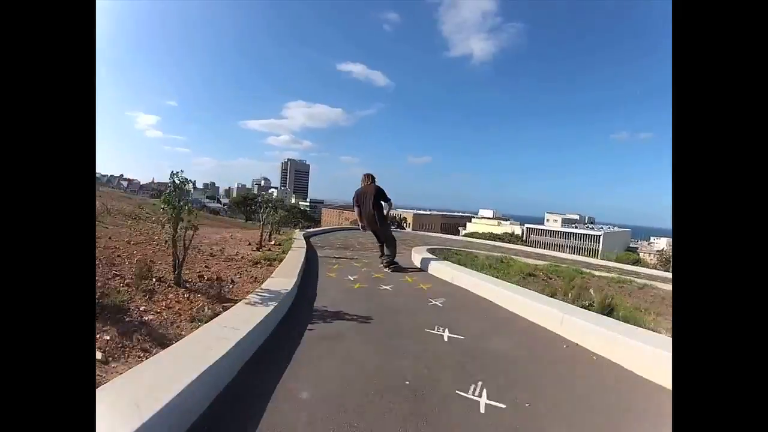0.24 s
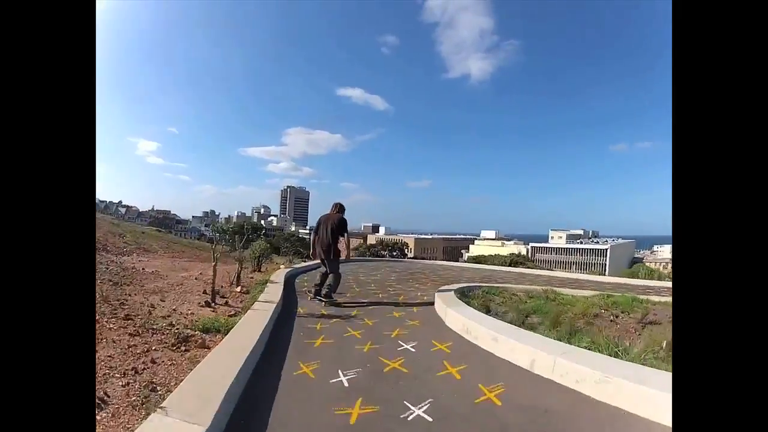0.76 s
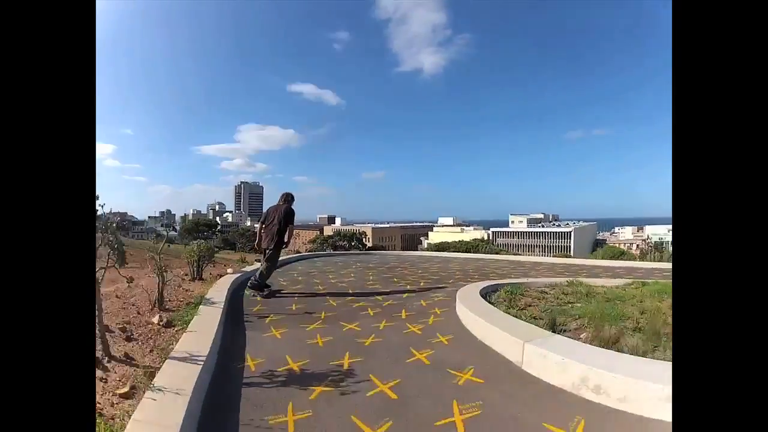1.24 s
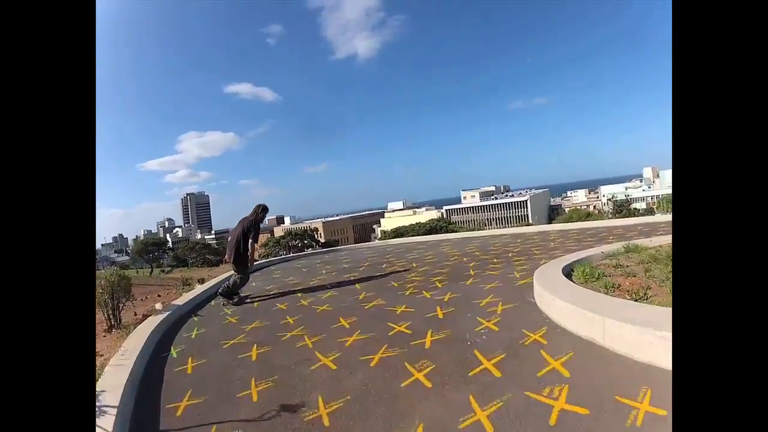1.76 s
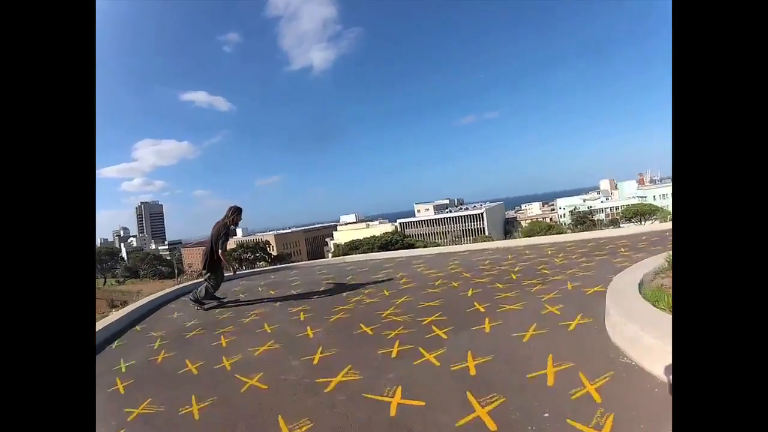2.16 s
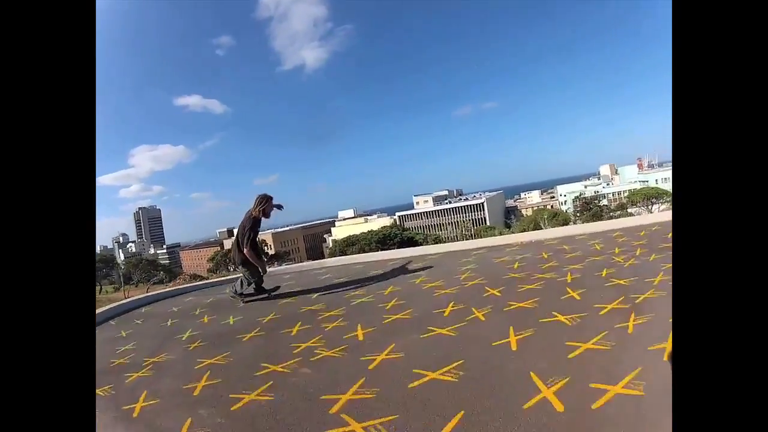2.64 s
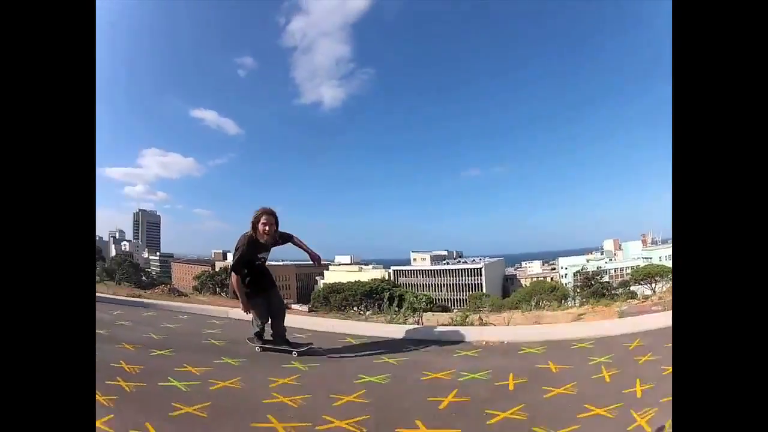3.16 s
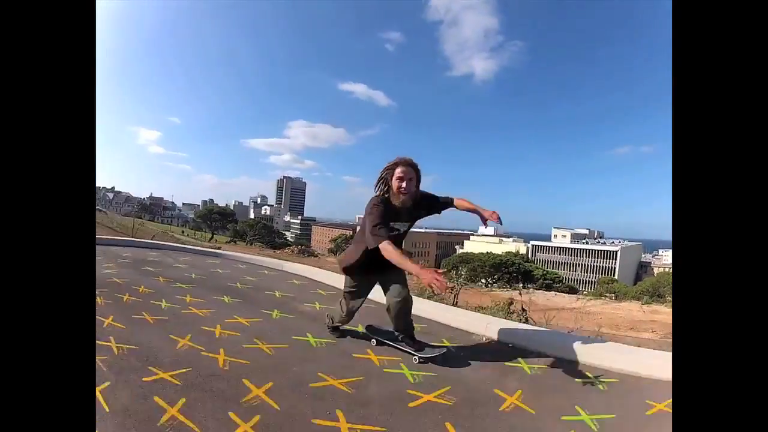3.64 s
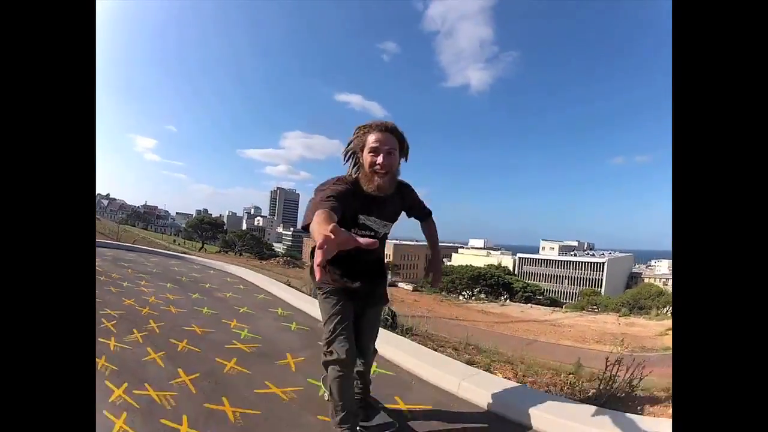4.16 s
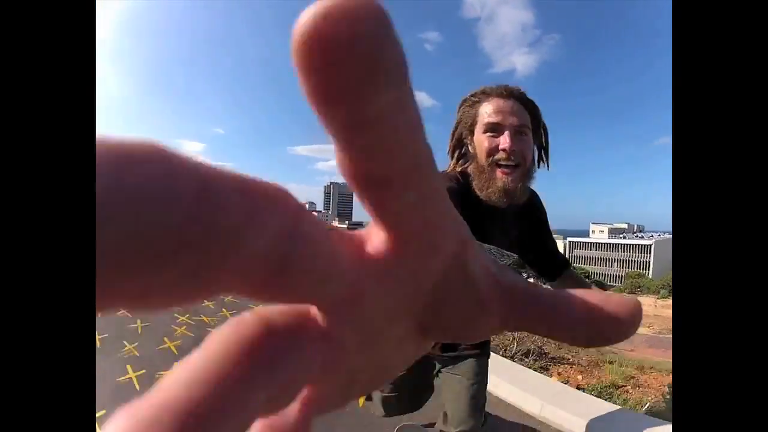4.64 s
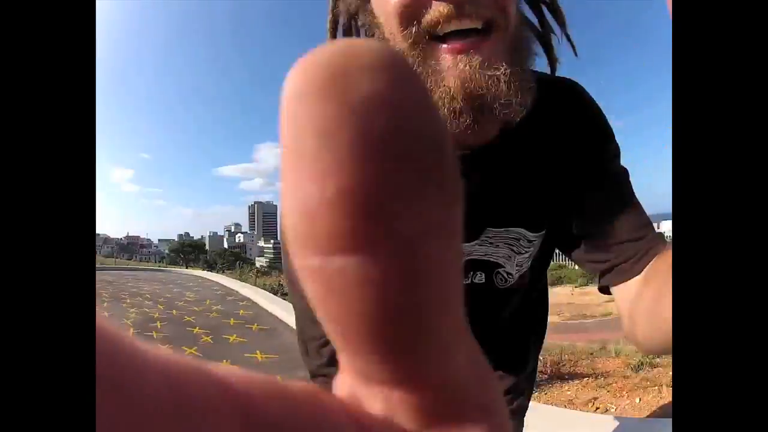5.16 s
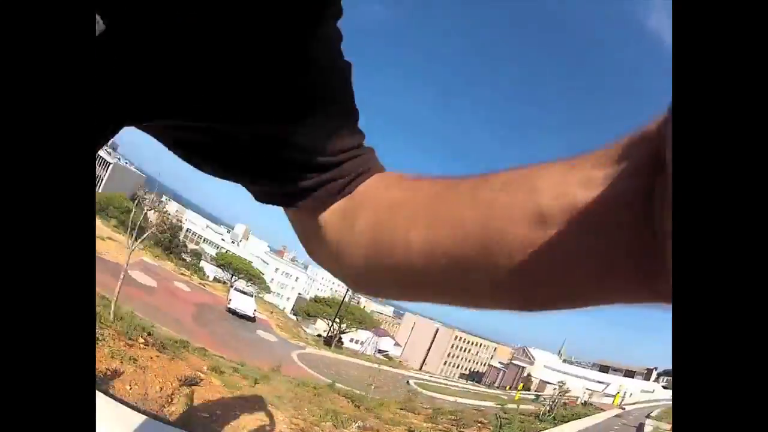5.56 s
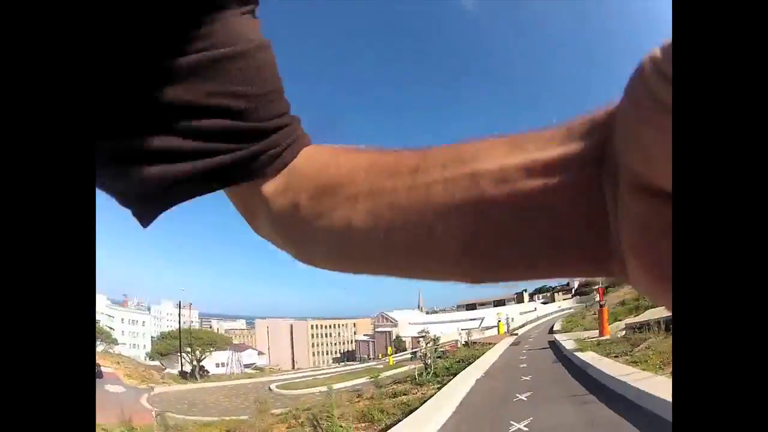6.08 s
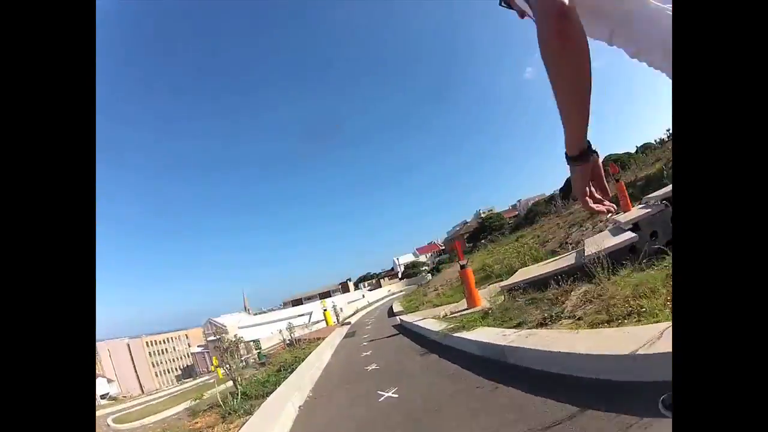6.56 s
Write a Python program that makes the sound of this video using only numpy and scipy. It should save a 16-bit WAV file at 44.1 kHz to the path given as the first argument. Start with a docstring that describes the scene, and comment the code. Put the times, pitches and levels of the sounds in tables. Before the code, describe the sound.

A low, boxy rolling drone of a skateboard outdoors, with dry ticks and deck knocks, then overloaded handling thumps and crackle before rolling on.

```python
"""A skateboard rolls over asphalt: grain under the wheels is random impulses that ring the deck, grit hisses.
Deck knocks and hand bumps are damped swings; ticks, scrapes and crackles are noise bursts in resonances.
Wind and a grabbing hand buffet a closed case as low noise, and the grip on it crackles.
The microphone in the case feeds a recorder that ducks after peaks, clips, and holds each coarse
sample as a stair step."""
import sys
import numpy as np
from scipy import signal
from scipy.fft import rfft, irfft
from scipy.io import wavfile
from scipy.ndimage import uniform_filter1d

SR = 44100
rng = np.random.default_rng(int(sys.argv[2]) if len(sys.argv) > 2 else 0)


def wav_record(signal):
    """Record a signal, one row per channel, as 16-bit PCM in the file named by sys.argv[1]."""
    frames = np.transpose(np.atleast_2d(signal))
    bounded = np.clip(frames, -1, 1)
    # unit amplitude maps onto the largest positive 16-bit level
    quanta = np.round(bounded * 32767).astype(np.int16)
    wavfile.write(sys.argv[1], SR, quanta)


N = 300762


def gain_of(db):
    """Logarithmic level: decibels to amplitude gain."""
    return 10 ** (np.asarray(db) / 20)


def evened(x):
    """Power normalization: scales to rms 1."""
    return x / np.sqrt(np.mean(x ** 2) + 1e-20)


def curves(rows):
    """Piecewise-linear envelopes: table columns joined by straight lines at every sample."""
    s, *columns = np.transpose(rows)
    return [np.interp(np.arange(N) / SR, s, c) for c in columns]


def add(mix, s, sound):
    """Superposition: adds a sound into the mix at s seconds."""
    part = mix[round(s * SR):][:len(sound)]
    part += sound[:len(part)]


def resonate(x, hz, width):
    """Resonance: shifts hz down to zero, smooths by two one-pole passes, shifts back; gain 1 at the centre."""
    turn = np.exp(2j * np.pi * hz * np.arange(len(x)) / SR)
    r = np.exp(-np.pi * width / SR)
    smooth = signal.lfilter([(1 - r) ** 2], [1, -2 * r, r * r], x / turn)
    return 2 * (turn * smooth).real


def read(points, at):
    """Spectral envelope: its level in dB at given frequencies, joined on a log-frequency axis."""
    f, db = np.transpose(points)
    return np.interp(np.log(at + 1), np.log(f + 1), db)


def colour(x, points):
    """Linear filtering: multiplies the spectrum of x by an envelope."""
    hz = np.fft.rfftfreq(len(x), 1 / SR)
    return evened(irfft(rfft(x) * gain_of(read(points, hz)), len(x)))


def patchy(x, gain_db, patchy_db):
    """Time-varying filtering: gain_db(hz, t) per frame, plus random patches over pitch and time."""
    hz, t, z = signal.stft(x, SR, nperseg=1024, noverlap=768)
    spots = rng.standard_normal(z.shape[::-1]).T
    spots = uniform_filter1d(uniform_filter1d(spots, size=6, axis=0), size=14, axis=1)
    gain = gain_of(gain_db(hz[:, None], t) + patchy_db * evened(spots))
    return evened(signal.istft(z * gain, SR, nperseg=1024, noverlap=768)[1][:N])


def flicker(per_s):
    """Low-passed noise: a slow chance curve of rms 1 that changes about per_s times a second."""
    size = max(round(SR / per_s), 1)
    return evened(uniform_filter1d(uniform_filter1d(rng.standard_normal(N), size), size))


def stones(per_s, spread_db):
    """Random impulse process: clicks of random sign at random moments; a few are large."""
    size = gain_of(spread_db * np.minimum(rng.exponential(1, N), 5))
    sign = np.sign(rng.standard_normal(N))
    struck = rng.random(N) < per_s / SR
    return size * sign * struck


# steady wind and handling on the case: start_s [s], level_db [dB]
BUFFET_LEVEL = [(0.0, -51), (0.93, -51), (1.4, -41), (1.7, -46.5), (2.32, -53), (2.65, -36.5), (3.2, -35.5),
                (3.58, -38), (3.7, -25), (4.02, -20), (4.25, -9), (4.7, -22), (5.07, -14), (5.14, -41),
                (5.36, -45.5), (5.8, -34), (6.2, -35.5), (6.82, -39)]
# gusts and jolts above that level, lulls below: middle_s [s], length_s [s], rise_db [dB]
GUST_SWELLS = [(1.337, .08, 7), (1.542, 0.067, 5), (1.95, 0.17, 11), (2.86, .08, 4.5), (2.985, 0.061, 6.5),
               (3.77, .08, 2), (3.92, 0.045, -12), (4.073, 0.081, 4), (4.397, 0.055, 13),
               (4.427, 0.043, -12), (4.476, 0.046, 8.5), (4.625, 0.13, 7.5), (4.787, 0.16, 5),
               (5.25, 0.16, 19), (6.268, 0.091, 13.5), (6.386, 0.052, 13), (6.467, 0.054, 9)]
# relative spectrum of the moving air: frequency_hz [Hz], density_db [dB per Hz]
GUST_SPECTRUM = [(15, -24), (40, -1.3), (70, -2), (120, -2.4), (200, -3), (320, -7.5), (600, -25.5),
                 (1200, -64)]


def buffet():
    """Turbulent pressure: low noise swells with gusts; tighter eddies play the same noise faster."""
    t = np.arange(N) / SR
    swells_db = sum(db * np.exp(-(2 * (t - s) / length) ** 4) for s, length, db in GUST_SWELLS)
    level_db = curves(BUFFET_LEVEL)[0] + swells_db
    tightness = np.clip(1 + .12 * flicker(per_s=15), .4, 1.9)  # playing speed
    air = colour(rng.standard_normal(2 * N), GUST_SPECTRUM)
    air = np.interp(np.cumsum(tightness), np.arange(2 * N), air)
    lumps = gain_of(1 * flicker(per_s=25))
    return gain_of(level_db) * evened(air * lumps)


def rustle():
    """Friction crackle: impulses of the grip in one resonance, louder as the steady buffeting rises."""
    at_0_db, follow = -32, .6  # level in dB at 0 dB of buffeting; dB per dB that it follows
    crackle = resonate(stones(per_s=1600, spread_db=2.5), hz=1370, width=870)
    return gain_of(at_0_db + follow * curves(BUFFET_LEVEL)[0]) * evened(crackle)


# short scrapes and crackles of overload: start_s [s], length_s [s], level_db [dB, before the soft ends],
# centre_hz [Hz], width_hz [Hz, of each resonance pass]
SCRAPE_AND_CRACKLE_EVENTS = [(1.203, 0.23, -57, 4320, 1500), (1.591, 0.055, -36.5, 3300, 2400),
                             (1.592, 0.031, -33, 1390, 1000), (1.606, 0.022, -26.5, 2670, 800),
                             (1.615, 0.14, -44, 3300, 2800), (1.67, 0.036, -40, 2620, 450),
                             (4.047, 0.04, -31.5, 1700, 2600), (4.089, 0.024, -31.5, 1600, 2400),
                             (4.138, 0.32, -44, 1390, 900), (4.74, .2, -48.5, 2920, 1200),
                             (4.961, 0.044, -29, 2292, 1320), (5.08, .05, -43, 3280, 2400),
                             (5.35, 0.035, -43.5, 2530, 1500), (5.617, 0.028, -46, 4240, 1200),
                             (5.614, 0.045, -45, 2100, 900), (5.984, 0.16, -43, 1630, 710)]


def scrapes_and_crackles():
    """Modulated noise in a resonance: noise broken into slips, in one resonance, with soft ends."""
    out = np.zeros(N)
    noises = rng.standard_normal((len(SCRAPE_AND_CRACKLE_EVENTS), 2, 12000))
    for (s, length, db, hz, width), (noise, slip_noise) in zip(SCRAPE_AND_CRACKLE_EVENTS, noises):
        n = min(round(length * SR), 12000)
        slips = noise * gain_of(3 * evened(uniform_filter1d(slip_noise, 120)))
        burst = evened(resonate(slips, hz, width)[:n])
        add(out, s, gain_of(db) * burst * signal.windows.tukey(n, .7))
    return out


# sharp ticks of stones and fingers on the case: start_s [s], peak_db [dB], pitch_hz [Hz],
# width_hz [Hz, of each resonance pass]
TICK_EVENTS = [(0.205, -27, 2730, 1800), (0.831, -35, 1970, 900), (0.8984, -26, 4400, 600),
               (0.9, -32, 2880, 600), (.902, -29, 1600, 900), (0.919, -38, 4500, 900),
               (0.98, -29, 2040, 1580), (1.596, -31, 2800, 2800), (2.26, -34, 2300, 1200),
               (3.062, -32, 2450, 900), (3.387, -31, 2480, 700), (3.426, -33, 2400, 1200),
               (3.698, -44, 2600, 900), (4.425, -15, 2600, 450), (4.652, -32, 2400, 2000),
               (4.881, -28, 2420, 2000), (5.059, -34, 4222, 2000), (5.246, -27, 3010, 2530),
               (5.264, -31, 2736, 2030), (5.303, -40, 2400, 2000), (5.519, -33, 3670, 1500),
               (5.759, -43, 4495, 1500), (6.03, -31, 1686, 915), (6.059, -30, 2000, 1515),
               (6.679, -28.5, 2315, 1200), (6.779, -34, 2553, 1580)]


def ticks():
    """Impact excitation: each tick is a dying burst of noise in one resonance."""
    rise_s, t60_s = 0.0031, 0.019  # of the burst that drives the resonance
    out, t = np.zeros(N), np.arange(3000) / SR
    burst = np.minimum(t / rise_s, 1) * gain_of(-60 * t / t60_s)
    noises = rng.standard_normal((len(TICK_EVENTS), len(t)))
    for (s, db, hz, width), noise in zip(TICK_EVENTS, noises):
        tick = resonate(noise * burst, hz, width)
        add(out, s, gain_of(db) * tick / abs(tick).max())
    return out


def damped_swings(rows, rise_s, t60_s):
    """Damped oscillation: each blow starts a sine that rises smoothly and dies exponentially."""
    out, t = np.zeros(N), np.arange(6000) / SR
    envelope = (1 - np.exp(-(t / rise_s) ** 2)) * gain_of(-60 * t / t60_s)
    for s, db, hz in rows:
        swing = np.sin(2 * np.pi * hz * t) * envelope
        add(out, s, gain_of(db) * swing / abs(swing).max())
    return out


# the hand bumps the case, loud enough to make the recorder clip: start_s [s], peak_db [dB], pitch_hz [Hz]
BUMP_EVENTS = [(4.056, -3, 115), (4.094, -0.5, 64), (4.16, -10.5, 75), (4.209, -22, 114), (4.364, -3, 115),
               (4.389, -2, 61), (4.458, 3.5, 140), (4.52, -10, 69.6), (4.598, 1.5, 80), (4.619, -10, 127),
               (4.649, -8, 80), (4.978, -8.5, 155), (5.048, -4, 115)]


def hand_bumps():
    """Damped oscillation of the bumped case, at low pitch."""
    return damped_swings(BUMP_EVENTS, rise_s=0.0058, t60_s=0.052)


# louder knocks in the rolling: start_s [s], peak_db [dB], pitch_hz [Hz]
KNOCK_EVENTS = [(0.696, -10.5, 550), (0.909, -7.5, 600), (1.113, -6, 625), (1.173, -10.5, 597),
                (2.07, -6.5, 700), (2.265, -4.5, 597), (3.187, -14, 524), (3.444, -13, 694),
                (3.572, -8, 630), (3.638, -14, 685), (3.894, -9, 654), (5.15, -3, 435), (5.28, -13, 655),
                (5.783, -8, 523), (6.387, -3, 633), (6.585, -8, 613), (6.678, -5.5, 535), (6.744, -10, 654)]


def deck_knocks():
    """Damped oscillation: short damped knocks of the deck at middle pitch."""
    return damped_swings(KNOCK_EVENTS, rise_s=0.0036, t60_s=0.019)


# grit hiss: start_s [s], level_db [dB]
HISS_LEVEL = [(0.0, -51), (0.7, -54), (1.69, -49.5), (2.56, -47.5), (3.2, -46), (3.55, -50.5), (4.23, -42),
              (4.7, -46), (4.96, -42.5), (5.45, -45.5), (5.65, -52.5), (6.02, -46.5), (6.46, -50.5),
              (6.82, -45)]
# relative spectrum of the hiss: frequency_hz [Hz], density_db [dB per Hz]
GRIT_SPECTRUM = [(1000, -29), (1700, -7), (1970, -6.5), (2260, -4), (2510, -4), (2990, -7), (3450, -14),
                 (3930, -15), (5950, -20.5), (7740, -59), (13100, -120)]


def grit_hiss(patch):
    """Dense impulse noise: fine grit clicks merge into a hiss that rises on rough patches."""
    loudness = gain_of(1.1 * patch + .8 * flicker(per_s=60))
    grit = stones(per_s=5000, spread_db=2.5) * loudness
    hiss = patchy(grit, lambda hz, t: read(GRIT_SPECTRUM, hz), patchy_db=2.0)
    return gain_of(curves(HISS_LEVEL)[0]) * hiss


# brief dips of the deck's ring, some just after a knock: deepest_s [s], depth_db [dB], recovery_s [s]
DIP_EVENTS = [(1.2, -5.5, 0.043), (2.29, -5.5, 0.18), (2.73, -5.5, 0.14), (3.61, -14, 0.019),
              (5.31, -6, 0.085), (5.46, -6, 0.019), (6.48, -1.5, 0.024), (6.57, -6, 0.016)]


def dips():
    """Amplitude modulation in dB: each dip falls quickly and recovers, both in straight lines."""
    t, fall_s = np.arange(N) / SR, 0.028
    return sum(np.interp(t, [s - fall_s, s, s + max(back, .01)], [0, db, 0]) for s, db, back in DIP_EVENTS)


# ground under the wheels: start_s [s], level_db [dB, before dips],
# brightness_db [dB, band near 1 kHz relative to the level; it blends the two colours below]
ROLLING = [(0.0, -15.5, -17), (0.5, -18.5, -17.5), (0.93, -20, -19), (1.03, -19.5, -14.5),
           (1.3, -21, -18.5), (1.36, -16.5, -17), (2.1, -18.5, -15.5), (2.45, -19, -15), (2.9, -17.5, -16),
           (3.5, -19, -18.5), (4.0, -18, -19.5), (4.3, -13.5, -18), (4.56, -18, -19), (4.85, -14.5, -16.5),
           (5.3, -16.5, -17), (5.7, -19.5, -23.5), (6.3, -18.5, -19), (6.82, -20.5, -17)]
# relative spectra of deck and wheels through the case, on rough and on smooth ground:
# frequency_hz [Hz], density_db [dB per Hz]
ROUGH_SPECTRUM = [(71, -67.5), (120, -31.5), (135, -12.5), (162, -8.5), (289, -6), (332, 0), (428, -9),
                  (491, 5.5), (533, -3.5), (679, 0), (1340, -25), (1540, -31), (1900, -37.5), (2470, -45),
                  (4180, -120)]
SMOOTH_SPECTRUM = [(71, -42.5), (120, -18), (211, -13), (263, -15.5), (292, -7), (356, -5), (399, -5),
                   (453, -8), (503, -3), (664, -0.5), (928, -29), (1280, -31.5), (1530, -44.5), (1900, -55),
                   (2470, -69), (4180, -120)]


def deck_ring(patch):
    """Source and filter: road-grain impulses ring a deck whose colour follows the ground."""
    s, _, bright_db = np.transpose(ROLLING)
    rough_db, smooth_db = -15, -21.5  # brightness at which each colour is heard alone
    road = evened(stones(per_s=4000, spread_db=1.2) * gain_of(.5 * patch))

    def deck_db(hz, t):
        """Spectral interpolation: blends the two colours in dB at constant power."""
        rough = (np.interp(t, s, bright_db) - smooth_db) / (rough_db - smooth_db)
        rough = np.clip(rough, -.5, 1.5)
        db = rough * read(ROUGH_SPECTRUM, hz) + (1 - rough) * read(SMOOTH_SPECTRUM, hz)
        return db - 10 * np.log10((gain_of(db) ** 2).sum(0))

    ring = patchy(road, deck_db, patchy_db=1.5)
    return gain_of(curves(ROLLING)[0] + dips()) * ring


def board():
    """Common modulation: the same rough patches lift both the deck's ring and the grit hiss."""
    patch = flicker(per_s=120)
    return deck_ring(patch) + grit_hiss(patch)


def scene():
    """Superposition: all sources sum at the single microphone."""
    case = buffet() + rustle() + scrapes_and_crackles() + ticks() + hand_bumps()
    return (case + deck_knocks() + board())[None]


def record(dry):
    """Compression and sampling: gain drops after peaks and recovers; then clipping, stairs, band limit."""
    peak_db = 20 * np.log10(abs(dry[0]) + 1e-9)
    fall_db = np.arange(N) * 68.0 / SR  # the held peak falls 68 dB a second
    held_peak_db = np.maximum.accumulate(peak_db + fall_db) - fall_db
    over_db = np.maximum(held_peak_db + 11.0, 0)  # above a threshold of -11 dB
    late_db = signal.lfilter([.006], [1, -.994], over_db)  # the gain follows a few ms late
    ducked = dry[0] / gain_of(.5 * late_db)  # half the excess is taken off
    guard = signal.butter(4, 5200, fs=SR, output="sos")  # weakens treble above half the coarse rate
    coarse = signal.resample_poly(signal.sosfilt(guard, ducked), 40, 147)  # to 12 kHz
    held = np.repeat(np.clip(coarse, -.56, .56), 4)  # 48 kHz stairs mirror the sound around 12 kHz
    steps = signal.resample_poly(held, 147, 160)[:N]  # back to SR
    steps = np.pad(steps, (0, N - len(steps)))
    band_limit = signal.firwin(511, 15270, window=("kaiser", 9), fs=SR)  # low-pass edge in Hz
    return signal.oaconvolve(steps, band_limit, "same")[None]


dry = scene()
out = record(dry)
wav_record(out)
```